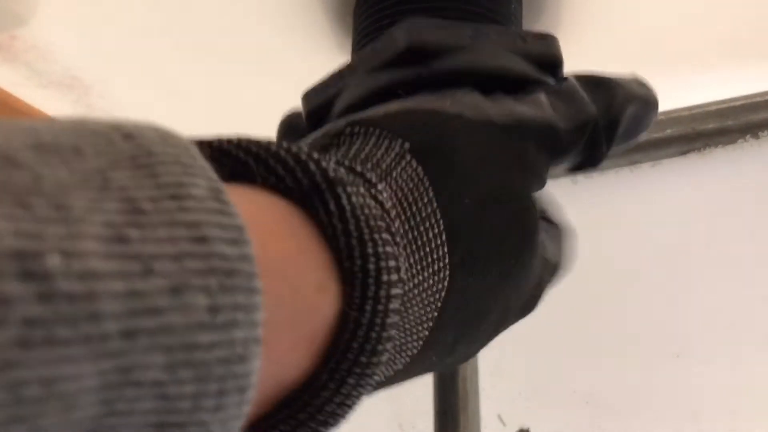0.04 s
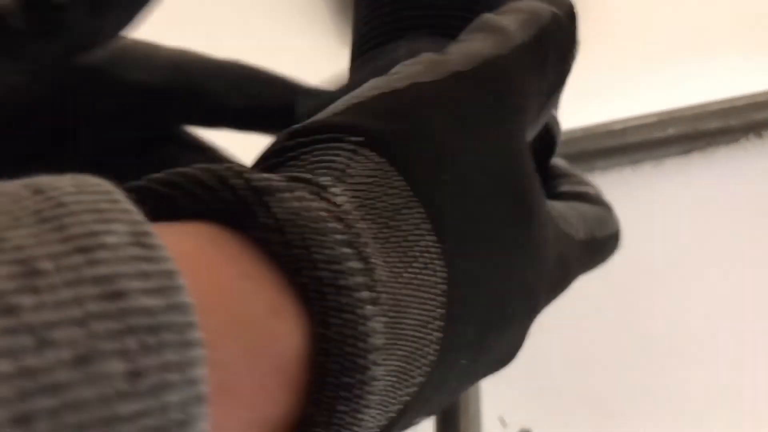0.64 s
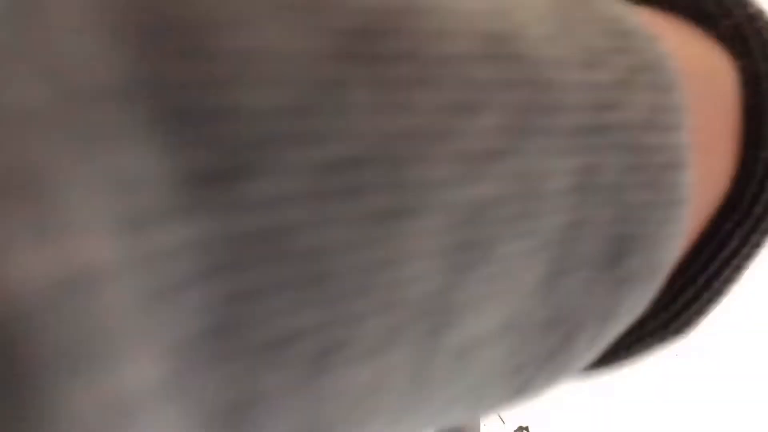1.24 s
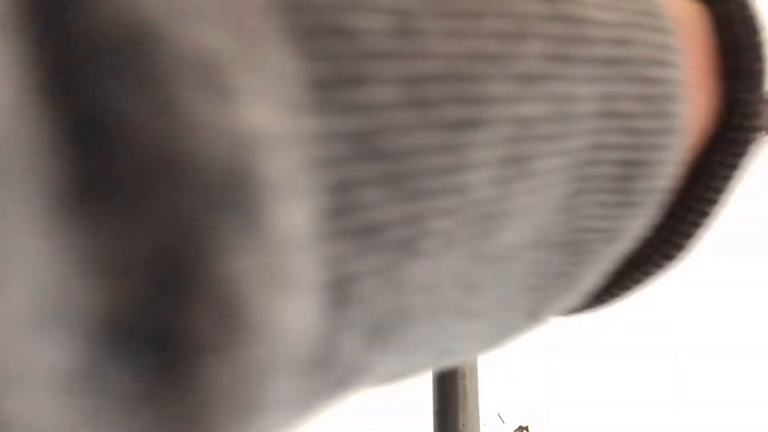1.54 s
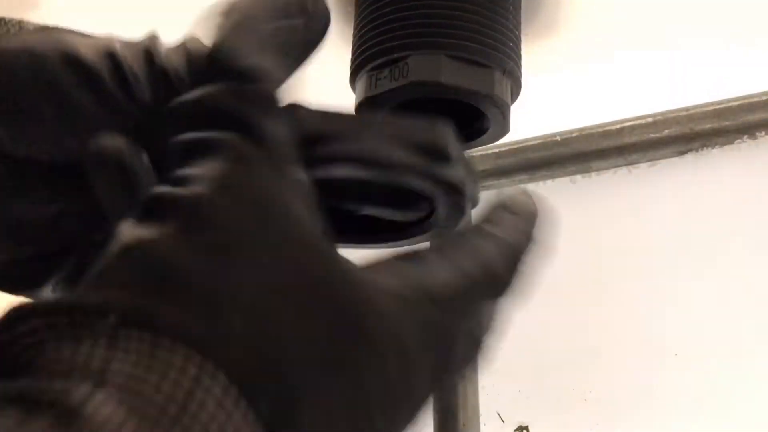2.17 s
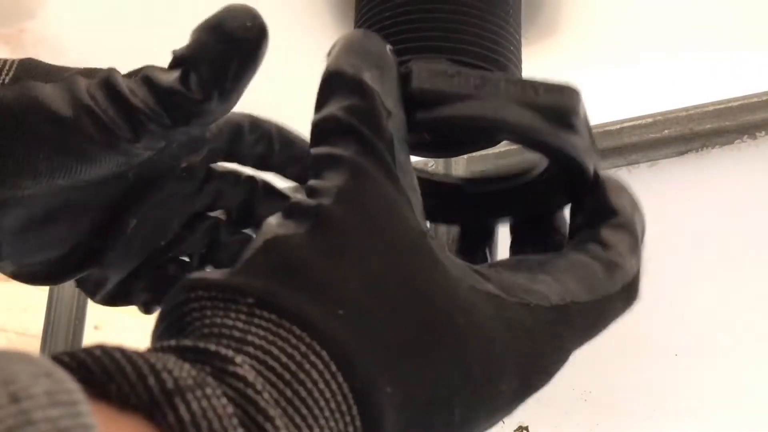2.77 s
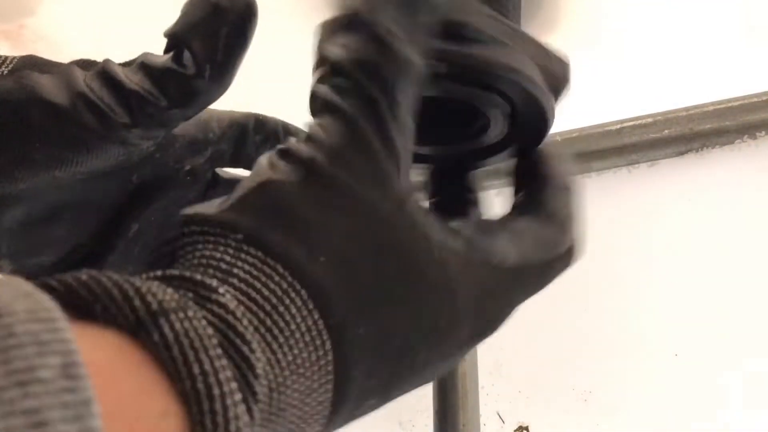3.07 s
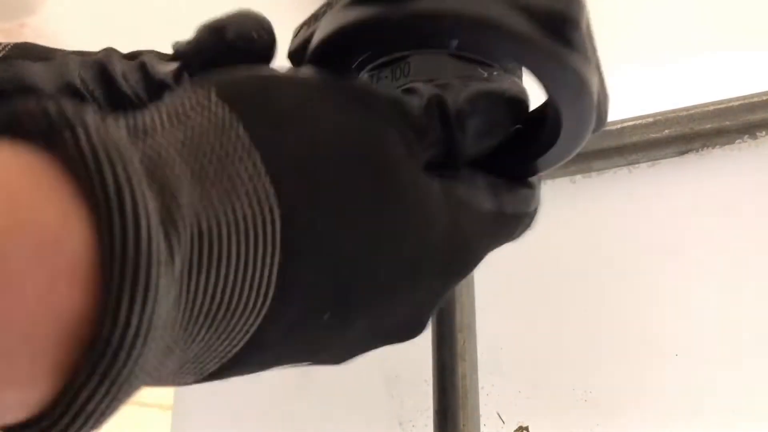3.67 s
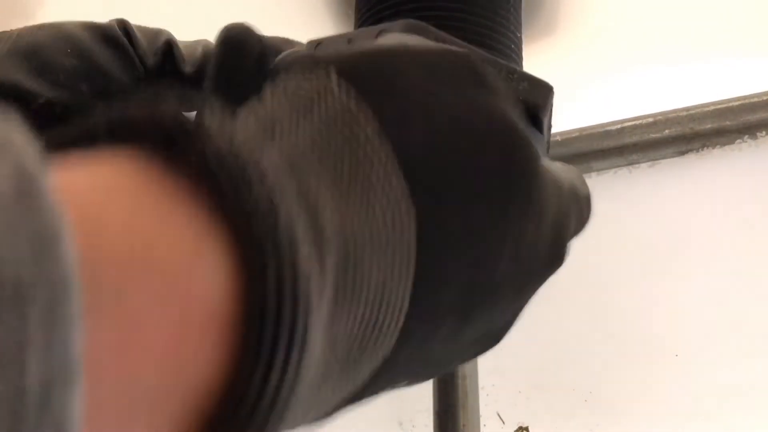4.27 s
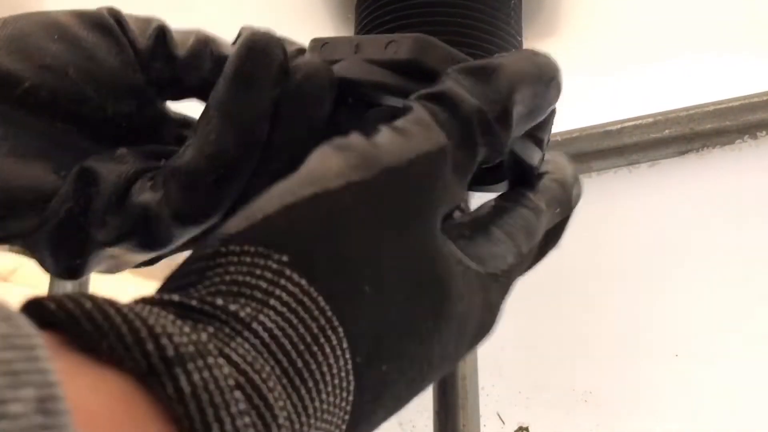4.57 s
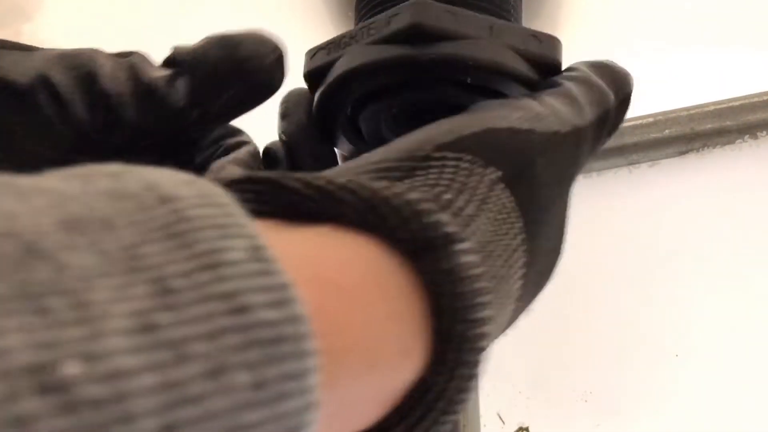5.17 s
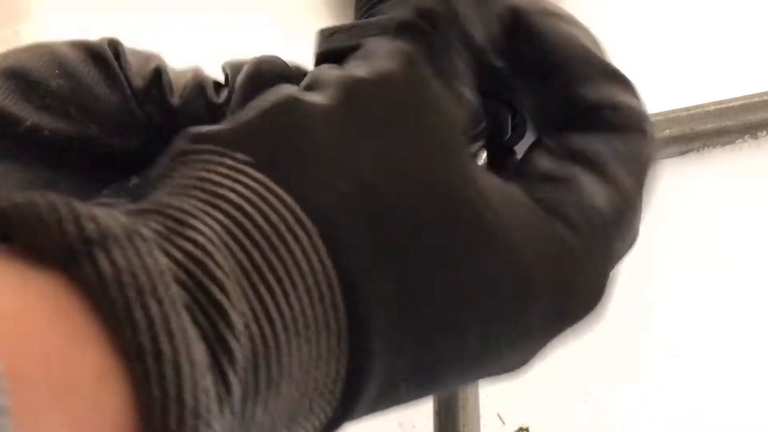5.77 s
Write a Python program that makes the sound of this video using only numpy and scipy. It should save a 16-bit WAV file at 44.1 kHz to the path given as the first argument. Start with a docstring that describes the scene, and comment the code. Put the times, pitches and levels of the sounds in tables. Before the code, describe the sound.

A plastic nut knocks and clicks irregularly against a drain fitting, heard up close, each contact giving a low thud from the hollow tank. About halfway through, the knocks come faster and the thread rasps in short twists, with faint glove rustle. A motor hums in the small room throughout. Finally, knit fabric scrubs across the microphone with a few loud, distorted thumps.

```python
"""Close to the microphone, in a small humming workshop, gloved hands fit a plastic nut to a tank's drain.
First come scattered knocks of nut on fitting, each booming in the hollow tank, and gloves and a sleeve
rustle. From about 2.8 s the nut is spun up the thread, which sticks, slips and scrapes under quicker
knocks. At about 5.5 s the sleeve rubs and bumps the microphone and overloads it."""
import sys
import numpy as np
from scipy import signal
from scipy.fft import rfft, irfft, next_fast_len
from scipy.io import wavfile
from scipy.ndimage import uniform_filter1d

SR = 44100
rng = np.random.default_rng(int(sys.argv[2]) if len(sys.argv) > 2 else 0)


def wav_out(sig):
    """Save sig, one row per channel (or a flat mono array), as 16-bit PCM at SR to the path in sys.argv[1]."""
    wavfile.write(sys.argv[1], SR, np.round(np.clip(np.atleast_2d(sig).T, -1, 1) * 32767).astype(np.int16))


N = 256424
TIME = np.arange(N) / SR

# knocks of the nut on the fitting: (time [s], body level [dB], clack over body [dB],
# tick over body [dB], relative tank boom [dB], clack pitch [Hz])
KNOCKS = [(0.061, -51, -18, -13, -26, 1480), (0.331, -34.5, -15, -12, -18.5, 1480),
          (0.4, -47, 2, -25, -29, 2090), (0.538, -35, -9, -30, -19.5, 3000),
          (0.616, -31.5, -11, -30, -37, 1420), (1.393, -29.5, -1, -17, -23, 1480),
          (1.546, -27, -1, -7, -9.5, 3980), (2.173, -25, -0.5, -5, -13.5, 1440),
          (2.472, -25, 1, -9, -21.5, 2420), (2.595, -34.5, -8, -21, -24, 1500),
          (2.797, -28, 0, -20, -27.5, 1560), (2.825, -22, -3.5, -15, -22, 1420),
          (2.948, -26, -3.5, -14.5, -40, 1810), (2.978, -23.5, -0.5, -10, -14.5, 1690),
          (3.334, -32.5, -14.5, -20, -27, 1450), (3.381, -28.5, -18.5, -18.5, -16.5, 1450),
          (3.539, -21.5, 1.5, 0, -20.5, 3040), (3.545, -22.5, 6, 0.5, -13.5, 2860),
          (3.834, -21.5, 7.5, 0, -8, 2690), (3.867, -29, -2, -11, -13, 2830),
          (4.016, -30, 1, -0.5, -19, 3130), (4.116, -30.5, -14, -17, -18, 1450),
          (4.137, -27, -5, -15, -50, 1700), (4.18, -27, -14, -28, -14, 1840),
          (4.425, -29, -17, -32, -17, 1480), (4.793, -32.5, -14, -23, -22.5, 1450),
          (4.884, -27.5, -9, -19.5, -16, 1340), (4.937, -29, -17, -25, -21.5, 1450),
          (4.978, -23.5, -11.5, -22.5, -18.5, 1400), (5.013, -26, -15, -21, -21, 1450)]
# twists of the nut against the thread: (start [s], length [s], level [dB])
TWISTS = [(0.0, 0.37, -43.5), (.33, 0.11, -40.5), (.512, 0.075, -39), (.62, 0.065, -40.5),
          (.968, 0.13, -41.5), (1.4, 0.048, -38.5), (2.79, 0.16, -32), (2.945, 0.28, -35),
          (3.195, 0.041, -38), (3.29, .07, -40.5), (3.36, 0.18, -40.5), (3.55, 0.11, -43),
          (3.84, 0.086, -33.5), (4.125, 0.105, -31.5), (4.225, 0.19, -36.5), (4.425, 0.37, -43),
          (4.79, .09, -42.5), (4.89, 0.16, -38.5), (4.97, 0.24, -40)]
# strokes of the gloves over the plastic: (start [s], length [s], level [dB])
STROKES = [(.14, .065, -46), (.22, 0.14, -52), (.385, 0.37, -49), (.8, 0.1, -53.5), (.915, 0.086, -50),
           (1.01, 0.24, -58.5), (1.77, 0.075, -50), (1.87, 0.015, -46.5), (1.965, 0.021, -49.5),
           (2.38, 0.22, -53.5), (3.13, 0.17, -52.5), (3.425, 0.098, -55), (3.66, 0.055, -53.5),
           (3.985, 0.1, -50.5), (4.12, 0.33, -52), (4.45, 0.2, -61.5), (4.638, 0.0094, -45.5),
           (4.715, .05, -54)]
# a twist bites and eases off, a stroke swells and holds: (attack [s], sag [dB/s], release [s])
TWIST_SHAPE, STROKE_SHAPE = (0.004, 76, 0.018), (0.02, 5.6, 0.021)


def nut_knocks(crack_t60=0.038, snap_s=0.0055, soft_rise_s=0.00061, grip_damping=.48):
    """Each knock is a snap and a short, dense ring; harder contacts start with a sharper impact."""
    # modes of nut and fitting: (frequency [Hz], relative level [dB], t60 without the grip [s])
    nut_modes = [(465, -7.5, 0.28), (617, -7, 0.15), (743, 1.5, 0.12), (890, -10, 0.24), (1391, 0.5, 0.12),
                 (1600, -4.5, 0.11), (1980, 0, 0.13), (2320, -3, 0.084), (2760, -3, .03), (2880, 2, .05),
                 (3036, -3, .16), (3200, -13, .22), (5300, -2, .047), (6970, -3, .058), (7300, -1, .053)]
    # spectrum of the contact's crack: (frequency [Hz], relative level [dB])
    crack_spectrum = [(150, -34), (300, -0.5), (700, 2.5), (1150, -8), (1600, -3.5), (3000, -4.5),
                      (4200, -9.5), (5400, 4), (6200, -2.5), (7400, 2.5), (10000, -10.5), (13000, -15.5),
                      (16000, -65)]
    out, t = np.zeros(N), np.arange(SR // 5) / SR
    for start, db, clack_db, tick_db, _, clack_hz in KNOCKS:
        hardness = min(amp(clack_db), 1)
        rise = 1 - np.exp(-t * (1 + 20 * hardness) / soft_rise_s)
        snap = 1.04 * np.exp(-(t / snap_s) ** 2)
        crack = colour(rng.standard_normal(len(t)), crack_spectrum) * (amp(-60 * t / crack_t60) + snap)
        # each point of contact stirs the modes in its own proportions; the grip damps and detunes them
        stirred = [(hz, mode_db - 7 + 2 * rng.standard_normal(), t60 * grip_damping)
                   for hz, mode_db, t60 in nut_modes]
        hit = (crack + ring(stirred, t, detune=.008)) * rise
        add(hit, 0, -6 * hardness ** 2 * signal.windows.hann(6))  # the impact
        body = crest(band(hit, 154, 1150))
        # the point of contact also colours the crack around one frequency
        favoured = crest(signal.lfilter(*signal.iirpeak(clack_hz, 4, fs=SR), crack * rise))
        clack = amp(clack_db) * crest(2 * crest(band(hit, 1510, 3850)) + 3.17 * favoured)
        tick = amp(tick_db) * crest(band(hit, 4300, 14000))
        add(out, start, amp(db) * (body + clack + tick))
    return out


def nut_graze(start_s=2.1, rise_s=0.0019, hiss_db=-45, hiss_s=0.032):
    """A glancing touch on the fitting hisses briefly and sets only the highest modes ringing."""
    # the thin, bright ring: (frequency [Hz], level [dB], t60 [s])
    high_modes = [(8300, -45, 0.37), (8950, -44, 0.24), (12150, -46, .06), (13300, -50, .04)]
    out, t = np.zeros(N), np.arange(SR // 3) / SR
    hiss = amp(hiss_db) * unit(band(rng.standard_normal(len(t)), 5700, 13000)) * np.exp(-t / hiss_s)
    add(out, start_s, (ring(high_modes, t) + hiss) * (1 - np.exp(-t / rise_s)))
    return out


def tank_booms(gain_db=2, floor_hz=76, floor_t60=0.21, wall_hz=104, wall_t60=0.59, wall_rise_s=0.023):
    """A knock shoves the tank floor; the large walls pick up the motion and ring on."""
    out, t = np.zeros(N), np.arange(SR // 2) / SR
    for start, _, _, _, boom_db, _ in KNOCKS:
        hz = floor_hz * rng.uniform(.88, 1.12)
        floor = amp(-60 * t / floor_t60) * np.sin(2 * np.pi * hz * t)
        walls = ring([(wall_hz, -9, wall_t60)], t) * (1 - np.exp(-t / wall_rise_s))
        add(out, start, amp(boom_db + gain_db) * (floor + walls))
    return out


def thread_scrape():
    """Under load the thread sticks and slips in clumps that ring the fitting; coasting, it hisses."""
    # resonances rung by the slips: (frequency [Hz], width [Hz], relative level [dB])
    scrape_peaks = [(275, 81, 0.5), (456, 45, 2.5), (594, 99, 3), (737, 85, 4), (882, 113, -1),
                    (1506, 280, -22.5), (2700, 300, -25)]
    # the nut coasting along the thread: (start [s], end [s], level [dB])
    spins = [(2.91, 3.126, -44), (3.055, 3.44, -47.5), (5.125, 5.427, -47)]
    # resonances of that smooth sliding: (frequency [Hz], width [Hz], relative level [dB])
    slide_peaks = [(830, 110, 10.5), (3160, 68, -39), (7050, 1100, -11), (8440, 870, -24)]
    slips = grains(per_s=300, spread_db=3.4) * amp(3.5 * wander(45))
    scrape = unit(band(resonate(slips, scrape_peaks), 142, 3600))
    slide = resonate(rng.standard_normal(N), slide_peaks)
    coasting = np.zeros(N)
    for start, end, db in spins:
        add(coasting, start, amp(db) * signal.windows.cosine(round((end - start) * SR)))
    return gestures(TWISTS, TWIST_SHAPE) * scrape + coasting * slide


def tank_sway(rest_db=-42, knock_db=-13, twist_db=6, stroke_db=17, settle_s=0.22):
    """The tank sways under the hands: every knock, twist and stroke pushes it, and it settles again."""
    # rumble of the swaying tank: (frequency [Hz], relative level [dB])
    rumble_spectrum = [(15, 10), (30, 13.5), (50, 5.5), (85, 5), (130, 0.5), (190, -10.5), (300, -19),
                       (600, -83)]
    twists = amp(twist_db) * gestures(TWISTS, TWIST_SHAPE)
    strokes = amp(stroke_db) * gestures(STROKES, STROKE_SHAPE)
    shoves = [(start, 0, boom_db + knock_db) for start, _, _, _, boom_db, _ in KNOCKS]
    knocks = gestures(shoves, (.01, 0, settle_s))
    power = amp(rest_db) ** 2 + twists ** 2 + strokes ** 2 + knocks ** 2
    return np.sqrt(power) * colour(rng.standard_normal(N), rumble_spectrum)


def sleeve_on_microphone():
    """Knit scrubs over the microphone's port; each bump squeezes air into it, then sucks it out."""
    # course of the scrubbing: (time [s], level [dB])
    scrub_levels = [(5.53, -31), (5.537, -27.5), (5.56, -33), (5.604, -32), (5.608, -12), (5.64, -25.5),
                    (5.7, -30), (5.745, -35), (5.81, -42.5)]
    # knit right on the port: (frequency [Hz], relative level [dB])
    scrub_spectrum = [(150, 12), (500, -6), (1100, -2), (1800, 8), (2400, -5.5), (3300, 4), (4400, -6),
                      (5600, -4.5), (8000, -11.5), (12000, -15.5), (16000, -35)]
    # bumps: (time [s], press [s], release [s], pressure [full scale], suction [full scale])
    bumps = [(5.485, .092, .03, .62, .42), (5.607, .0365, .0545, 3.5, 7), (5.698, .0435, .0235, 4.5, 1.2),
             (5.765, .027, .06, .6, 2.6)]
    scrubbing = level(scrub_levels) * (TIME > scrub_levels[0][0])
    out = scrubbing * colour(rng.standard_normal(N), scrub_spectrum)
    for start, press_s, release_s, pressure, suction in bumps:
        add(out, start, pressure * signal.windows.cosine(round(press_s * SR)))
        add(out, start + press_s, -suction * signal.windows.cosine(round(release_s * SR)))
    return out


def cloth_rustle(flutter_db=1.1, swish_focus=1.4):
    """Fibres catch and let go: a fine, crisp hiss from the gloves, a duller swish from the sleeve."""
    # hiss of the gloves: (frequency [Hz], relative level [dB])
    glove_spectrum = [(600, -18), (1500, -3.5), (3000, 1), (4500, -2.5), (6000, -1), (8000, 0), (11000, 1),
                      (13000, -5), (16000, -16)]
    # hiss of the sleeve: (frequency [Hz], relative level [dB])
    sleeve_spectrum = [(500, 5.5), (1100, 3), (1600, 2), (2300, 1.5), (3100, -1), (4500, -2.5), (6500, -3),
                       (12000, -14)]
    # swishes as the arm moves: (start [s], length [s], level [dB], centre [Hz])
    swishes = [(0.964, 0.12, -48.5, 1580), (1.156, .24, -50.5, 3180), (1.387, 0.44, -58.5, 1400),
               (1.968, 0.02, -43.5, 1110), (5.16, 0.79, -58, 1690)]
    swish_shape = (0.0077, 5, 0.082)  # (attack [s], sag [dB/s], release [s])
    fibres = grains(per_s=3000, spread_db=3.8) + .5 * rng.standard_normal(N)
    hiss = colour(fibres, glove_spectrum)
    # the hiss brightens and dulls as the fingers change pace
    dull = signal.lfilter(*signal.butter(1, 4000, fs=SR), hiss)
    pace = amp(2 * wander(9.8))
    rustle = gestures(STROKES, STROKE_SHAPE) * unit(dull / pace + (hiss - dull) * pace)
    knit = colour(rng.standard_normal(N), sleeve_spectrum)
    for start, length, db, hz in swishes:
        swish = unit(knit + swish_focus * resonate(knit, [(hz, hz / 2, 0)]))
        rustle += gestures([(start, length, db)], swish_shape) * swish
    return rustle * amp(flutter_db * wander(70))


def workshop_tone(air_db=-47, waver_cycles=0.17):
    """Behind the work: a wavering motor hum, still air and the draft of the passing arm."""
    # partials of the motor: (frequency [Hz], level [dB])
    partials = [(118.4, -38.5), (253.0, -58.5), (360.7, -66), (689.1, -64.5), (721.4, -61), (1319, -72)]
    # still air of the room: (frequency [Hz], relative level [dB])
    air_spectrum = [(40, -7), (130, 8), (200, -2.5), (400, -8.5), (760, -14.5), (1100, -17), (2500, -26),
                    (5000, -28), (11000, -29), (16000, -45)]
    # air pushed by the arm: (time [s], level [dB])
    draft_levels = [(1.0, -33), (1.12, -15), (1.5, -32)]
    hum = np.zeros(N)
    for hz, db in partials:
        waver = waver_cycles * np.sqrt(hz / partials[0][0]) * wander(7.7)
        hum += amp(db) * np.sqrt(2) * np.sin(2 * np.pi * (hz * TIME + waver))
    draft = level(draft_levels) * colour(rng.standard_normal(N), [(10, -9.5), (30, -11.5), (300, -129)])
    air = amp(air_db) * colour(rng.standard_normal(N), air_spectrum)
    return hum + air + draft


def room_echo(x, delay_s=0.0036):
    """The small room returns scattered echoes whose treble dies first."""
    # decay of the room: (frequency [Hz], t60 [s])
    decay_times = [(100, 0.68), (700, 0.34), (3000, 0.18), (8000, 0.16), (15000, 0.18)]
    hz, t, spectra = signal.stft(rng.standard_normal(SR // 2), SR, nperseg=256)
    decay = amp(-60 * t / at_hz(decay_times, hz)[:, None])
    _, tail = signal.istft(spectra * decay, SR, nperseg=256)
    tail *= np.clip(np.arange(len(tail)) / SR / delay_s - 1, 0, 1)
    return signal.fftconvolve(x, tail / np.linalg.norm(tail))[:N]


def amp(db):
    """Decibels to gain."""
    return 10 ** (np.asarray(db) / 20)


def unit(x):
    """Scales to an rms of 1."""
    return x / np.sqrt(np.mean(x ** 2) + 1e-20)


def crest(x):
    """Scales so that the loudest 5 ms have an rms of 1."""
    return x / np.sqrt(uniform_filter1d(x ** 2, size=220).max() + 1e-20)


def at_hz(points, hz):
    """Reads a curve on a log-frequency axis."""
    knots_hz, values = np.transpose(points)
    return np.interp(np.log(hz + 1), np.log(knots_hz + 1), values)


def level(rows):
    """Gain over time from a curve in dB."""
    return amp(np.interp(TIME, *np.transpose(rows)))


def colour(x, spectrum):
    """Filters x by a spectrum, at an rms of 1."""
    size = next_fast_len(len(x))
    gain = amp(at_hz(spectrum, np.fft.rfftfreq(size, 1 / SR)))
    return unit(irfft(rfft(x, size) * gain, size)[:len(x)])


def band(x, lo_hz, hi_hz):
    """Causal band-pass."""
    return signal.sosfilt(signal.butter(3, [lo_hz, hi_hz], "band", fs=SR, output="sos"), x)


def resonate(x, peaks):
    """Passes x through side-by-side resonances of alternating sign, at an rms of 1."""
    return unit(sum(amp(db) * (-1) ** k * signal.lfilter(*signal.iirpeak(hz, hz / width, fs=SR), x)
                    for k, (hz, width, db) in enumerate(peaks)))


def wander(per_s):
    """Slow random drift with a spread near 1."""
    knots = rng.standard_normal(4096)
    return np.interp(TIME * per_s, np.arange(len(knots)), knots)


def grains(per_s, spread_db):
    """Sparse clicks of uneven size, at an rms of 1."""
    size = amp(spread_db * np.minimum(rng.exponential(1, N), 4))
    return unit(size * rng.choice([-1, 1], N) * (rng.random(N) < per_s / SR))


def ring(modes, t, detune=0):
    """Dying sines, each starting at a chance phase."""
    out = np.zeros(len(t))
    for hz, db, t60 in modes:
        hz *= 1 + detune * rng.standard_normal()
        out += amp(db - 60 * t / t60) * np.sin(2 * np.pi * (hz * t + rng.random()))
    return out


def gestures(rows, shape):
    """Gain over time of hand movements: each rises, sags while it lasts, and dies away."""
    attack_s, sag_db_per_s, release_s = shape
    power, t = np.zeros(N), np.arange(SR) / SR
    for start, length, db in rows:
        attack = np.minimum(t / attack_s, 1)
        release = np.exp(-np.maximum(t - length, 0) / release_s)
        add(power, start, (attack * amp(db - sag_db_per_s * t) * release) ** 2)
    return np.sqrt(power)


def add(mix, start_s, sound):
    """Mixes a sound in at start_s."""
    part = mix[round(start_s * SR):][:len(sound)]
    part += sound[:len(part)]


def scene(knock_room_db=-10, thread_room_db=-7, linger_db=-10):
    """One microphone: nut, tank and cloth close by, the workshop behind, the sleeve right on the port."""
    hits = nut_knocks() + nut_graze()
    scrape = thread_scrape()
    echo = room_echo(amp(knock_room_db) * hits + amp(thread_room_db) * scrape)
    # a cluster of modes of the fitting keeps ringing after the hard clacks
    linger = amp(linger_db) * band(room_echo(hits), 2830, 3230)
    close = hits + scrape + linger + tank_booms() + tank_sway() + cloth_rustle()
    return (close + echo + workshop_tone() + sleeve_on_microphone())[None]


def record(dry):
    """The microphone clips at its limit, blanking all other sound; the treble ends at 15.9 kHz."""
    clipped = np.clip(dry, -.97, .97)
    low_pass = signal.firwin(255, 15900, window=("kaiser", 9), fs=SR)
    return signal.oaconvolve(clipped, low_pass[None], "same")


dry = scene()
out = record(dry)
wav_out(out)
```